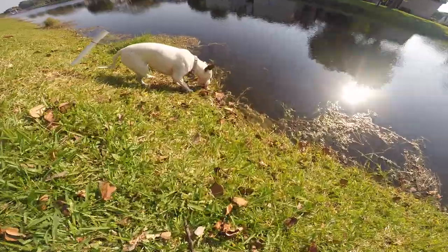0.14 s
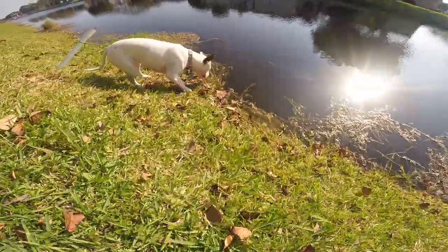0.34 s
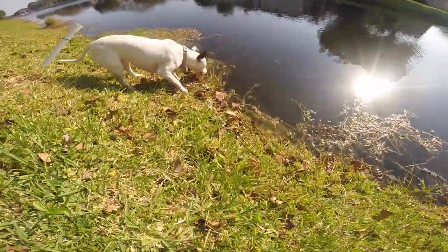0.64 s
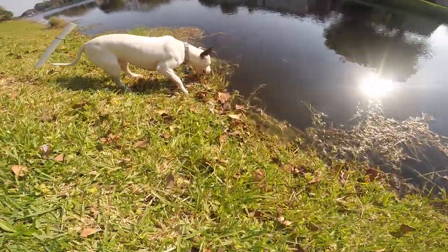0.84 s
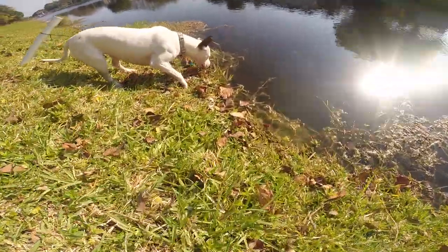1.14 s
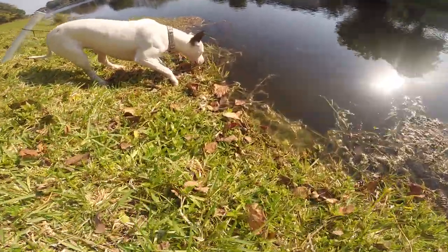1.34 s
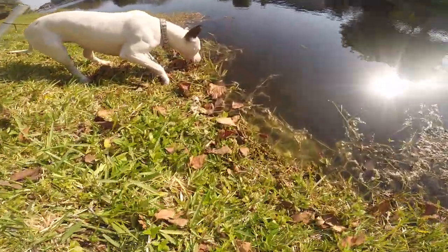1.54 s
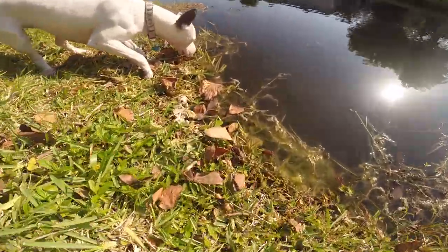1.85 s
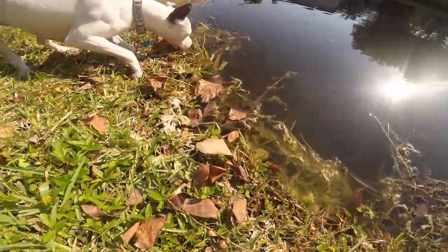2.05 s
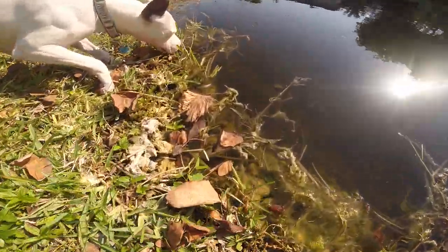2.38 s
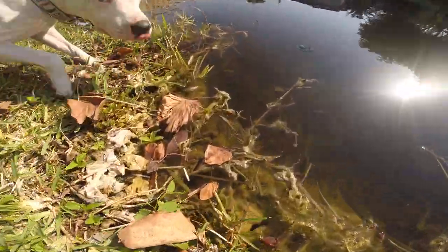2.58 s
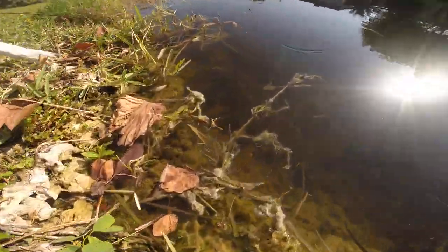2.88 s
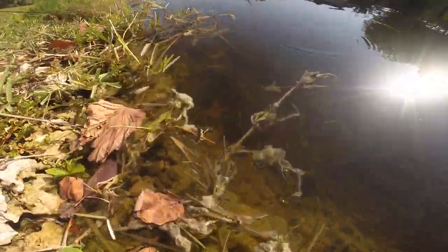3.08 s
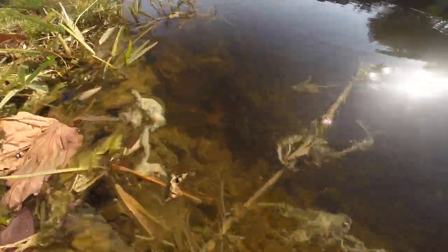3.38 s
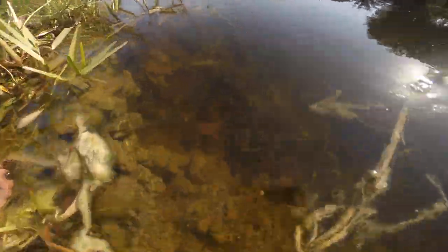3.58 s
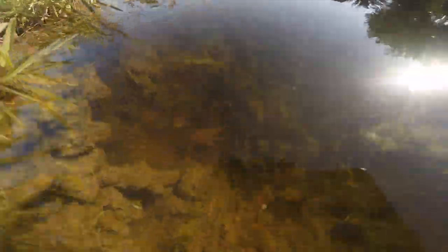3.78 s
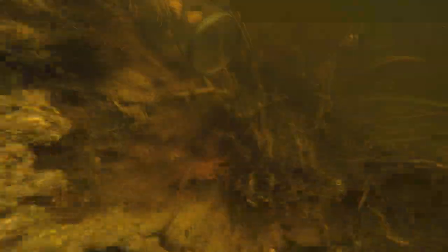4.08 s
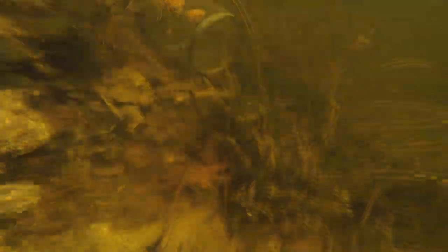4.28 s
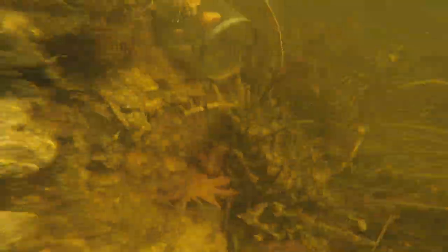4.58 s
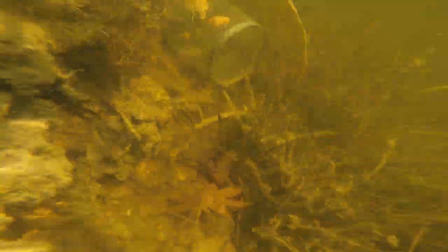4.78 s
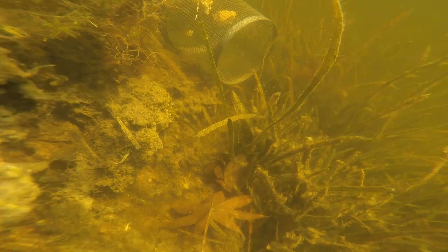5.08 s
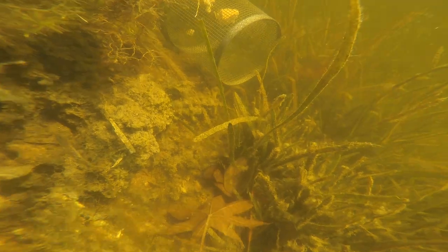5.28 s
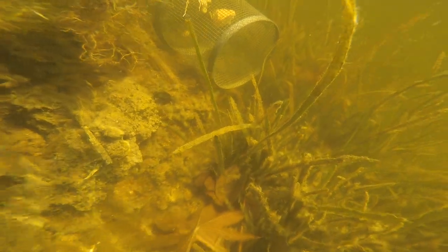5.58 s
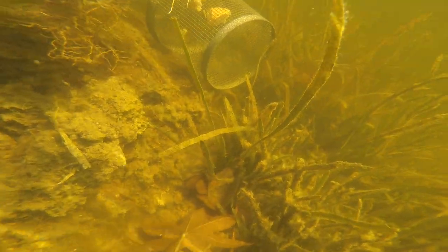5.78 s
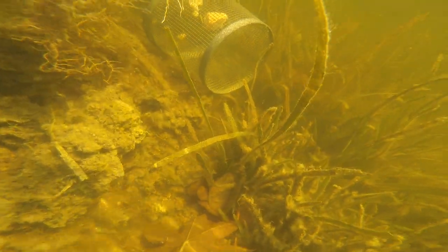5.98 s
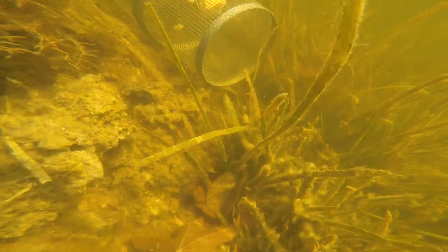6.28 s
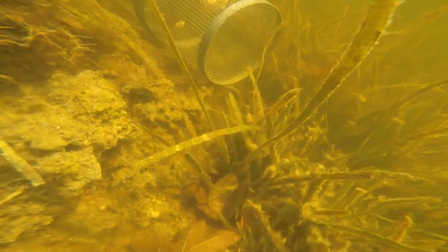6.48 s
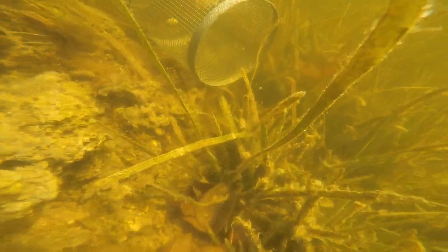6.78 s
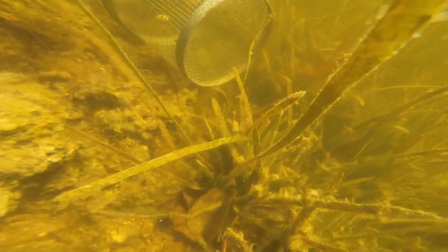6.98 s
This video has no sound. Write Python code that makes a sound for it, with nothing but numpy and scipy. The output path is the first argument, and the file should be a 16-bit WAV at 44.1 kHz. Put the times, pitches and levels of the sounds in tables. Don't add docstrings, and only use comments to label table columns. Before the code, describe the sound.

Close, muffled handling noise, the microphone shut in a waterproof case. Plastic taps and deep, springy booms come in irregular groups, with barely audible grass rustle. Delicate metal tags jingle faintly nearby, then a hard click and splash mark the dip under water. Bubbles blip and gulp, the tone grows duller, and a burst of heavy knocks and rubbing fades to low rumble and faint hiss.

```python
import sys
import numpy as np
from scipy import signal
from scipy.fft import rfft, irfft
from scipy.io import wavfile
from scipy.ndimage import uniform_filter1d

SR = 44100
rng = np.random.default_rng(int(sys.argv[2]) if len(sys.argv) > 2 else 0)


def to_wav(s):
    ch = np.atleast_2d(s).T
    pcm = np.round(np.clip(ch, -1, 1) * 32767)
    wavfile.write(sys.argv[1], SR, pcm.astype(np.int16))


def invert_db(level):
    return 10 ** (np.asarray(level, dtype=float) / 20)


N = 314874
DIVE_S = 4.3
PING_WIDTH, SNAP_WIDTH = 0.09, 0.8

# t/s, shell crack level/dB, thud level/dB, upper bending tone against lower/dB
BLOWS = [(-0.022, -80, -25, -10), (0.022, -66, -39, 9), (0.0986, -64, -15, 5), (0.1324, -58, -22.5, 6),
         (0.329, -45, -34.5, 13), (0.359, -27.5, -24.5, 8.5), (0.396, -36.5, -25.5, 10.5),
         (0.850, -40, -27, 1), (0.862, -29, -49, -9), (0.884, -24.5, -29.5, 4), (0.903, -24.5, -25.5, -8),
         (0.945, -62, -37, 21), (1.022, -42, -36, 4), (1.055, -63, -39.5, 7), (1.166, -50, -31.5, 10),
         (1.225, -29.5, -35.5, 19), (1.416, -28, -19, -0.5), (1.881, -73, -37.5, 3.5),
         (2.7, -58, -29.5, -4), (2.742, -38, -26, 13.5), (2.8975, -29, -16, 0), (2.931, -58, -34.5, 23),
         (2.951, -48, -29, 14), (3.0555, -49, -12, 6), (3.476, -28.5, -14.5, 5.5)]
# t/s, crack level/dB, thud level/dB, upper against lower/dB
WET_BLOWS = [(4.0648, -19, -41, 1), (4.604, -32, -27.5, -0.5), (5.0, -60, -40, 0), (5.249, -61, -40.5, 1),
             (5.662, -42, -32, 9), (5.681, -43.5, -24, 4), (5.726, -44, -24, 2), (5.7539, -43, -23, 9.5),
             (5.775, -43, -21, 8), (5.809, -72, -15.5, -1), (5.988, -24.5, -17, 3), (6.03, -51, -17, 2),
             (6.039, -31, -31, 1), (6.048, -22, -17, -2.5), (6.0815, -15.5, -14, 5.5),
             (6.131, -26.5, -45, -2), (6.176, -37, -32, 3), (6.36, -48, -30, -5), (6.513, -55, -27.5, -7),
             (6.628, -69, -33.5, 3), (6.904, -56, -46, 3)]


def evened(x):
    return x / np.sqrt(np.mean(x ** 2) + 1e-20)


def add(mix, s, sound):
    at = round(s * SR)
    heard = sound[max(-at, 0):]
    part = mix[max(at, 0):][:len(heard)]
    part += heard[:len(part)]


def resonate(x, hz, width):
    r = np.exp(-np.pi * width / SR)
    return (1 - r) * signal.lfilter([1, 0, -1], [1, -2 * r * np.cos(2 * np.pi * hz / SR), r * r], x)


def twice(x, hz, width):
    return resonate(resonate(x, hz, width), hz, 0.5 * width)


def burst(db, hz, t60, width, leak=0.04):
    t = np.arange(2500) / SR
    spray = rng.standard_normal(len(t)) * invert_db(-60 * t / t60)
    spray[0] += 8.0
    spray = twice(spray, hz, width) + leak * uniform_filter1d(spray, size=7)
    return invert_db(db) * spray / abs(spray).max()


def soft_start(t, rise):
    return np.sin(np.pi / 2 * np.minimum(t / rise, 1)) ** 2


def ring(modes, pitch, t):
    return sum(weight * invert_db(-60 * t / t60) * np.sin(2 * np.pi * hz * pitch * t) for hz, weight, t60 in modes)


def pole():
    # f/Hz, signed weight, t60/s
    bends = [(65.08, 1, 0.41), (89.3, -1.67, 0.2)]
    # f/Hz, signed weight, t60/s
    stiff_bends = [(150.5, -1.45, 0.092), (234.7, 0.56, 0.094), (429.5, -0.47, 0.028)]
    # t/s, level/dB, pitch ratio
    knocks = [(0.104, -36, 1), (0.125, -36, 1), (2.951, -36, 1), (3.0545, -29, 1.05), (3.068, -33, 1.1),
              (3.482, -33, 1), (4.2, -43, 1), (5.748, -29, .9), (5.773, -27, .9), (5.795, -31, .9)]
    # t/s, level/dB
    grip = [(0.0, -23.5), (0.12, -38), (1.11, -44), (1.95, -47.5), (2.66, -47.5), (2.95, -33.5),
            (3.22, -51.5), (3.52, -49), (3.66, -49), (4.26, -48.5), (4.62, -48.5), (4.74, -57.5),
            (4.9, -46.5), (5.68, -47), (5.83, -35), (6.5, -35.5), (6.78, -37.5), (7.14, -36)]
    wet_pitch, wet_upper = 0.885, 0.965
    rise_s, slowest_s = 0.0038, 0.015
    out, t = np.zeros(N), np.arange(SR // 2) / SR

    for s, crack_db, db, upper_db in BLOWS + WET_BLOWS:
        wet = s > DIVE_S
        pitch = wet_pitch if wet else 1
        low = ring(bends[:1], pitch, t)
        high = ring(bends[1:], pitch * (wet_upper if wet else 1), t)
        hard_db = min(1 + 0.69 * (crack_db - db), 7.5)
        body = invert_db(-upper_db / 2) * low + invert_db(upper_db / 2) * high
        body = body + invert_db(hard_db) * ring(stiff_bends, 0.955, t)
        rise = np.clip(rise_s * invert_db(0.32 * (db - crack_db - 15)), rise_s, slowest_s)
        add(out, s + 0.004, invert_db(db - 2.0) * body * soft_start(t, rise))
    for s, db, pitch in knocks:
        add(out, s, invert_db(db) * ring(stiff_bends, pitch, t) * soft_start(t, rise_s))

    now = np.arange(N) / SR
    shake = rng.standard_normal(N)
    in_air = sum(resonate(resonate(shake, hz, 4.9), hz, 32.0) for hz, _, _ in bends)
    in_water = sum(resonate(resonate(shake, hz * wet_pitch, 2.7), hz, 42) for hz, _, _ in bends)
    dipped = np.clip((now - DIVE_S) / 0.05, 0, 1)
    hum = np.sqrt(dipped) * evened(in_water) + np.sqrt(1 - dipped) * evened(in_air)
    hum = hum + invert_db(-41.5) * evened(resonate(resonate(shake, 150, 150), 130, 360))

    sway = evened(resonate(resonate(rng.standard_normal(N), 18.6, 24), 20.7, 27))
    tremor = invert_db(np.interp(now, *np.transpose(grip)))
    thrown = uniform_filter1d(abs(out), round(0.039 * SR))
    return out + tremor * hum + (invert_db(-4) * tremor + invert_db(-18) * thrown) * sway


def shell(drive):
    # f/Hz, width/Hz, level/dB
    air_modes = [(437, 45, 13), (664, 51, 12.5), (1150, 190, 4.5), (1560, 144, 8.5), (1790, 125, 10),
                 (2090, 330, 7), (2730, 250, 7.5), (2970, 136, 6), (3530, 91, 4), (4700, 145, 1),
                 (5650, 890, -9.5)]
    # f/Hz, width/Hz, level/dB
    water_modes = [(438, 90, 3), (630, 60, 7), (920, 50, 8.5), (1170, 56, 2.5), (1280, 44, 6.5),
                   (1530, 320, -1.5), (2320, 200, -5), (2730, 140, -9.5), (3480, 400, -18),
                   (4666, 120, -13), (5800, 170, -22)]
    wet = np.arange(N) / SR > DIVE_S
    out = np.zeros(N)
    for part, modes in ((drive * ~wet, air_modes), (drive * wet, water_modes)):
        gain = np.sqrt(sum(invert_db(2 * db) * w for _, w, db in modes) * np.pi / SR)
        for k, (hz, w, db) in enumerate(modes):
            out += (-1) ** k * invert_db(db) * resonate(part, hz, w) / gain
    return signal.sosfilt(signal.butter(3, 6500, fs=SR, output="sos"), out)


def contact():
    # start t/s, length/s, level/dB
    rubs = [(0.024, 0.025, -59), (0.09, 0.073, -41), (0.178, 0.035, -72), (0.314, 0.012, -49),
            (0.29, 0.025, -60), (0.366, 0.015, -47.5), (0.393, 0.099, -50.5), (0.86, 0.11, -59),
            (0.907, 0.14, -63.5), (1.024, 0.014, -56), (1.226, 0.044, -54), (1.433, 0.054, -57),
            (2.84, 0.026, -56), (4.037, 0.026, -49), (4.076, 0.023, -50.5), (5.656, 0.04, -64),
            (5.732, 0.021, -60), (6.02, 0.13, -47.5), (6.134, 0.11, -46.5), (6.085, 0.04, -46),
            (6.22, 0.045, -58), (6.54, 0.06, -61), (3.06, 0.04, -60), (5.77, 0.08, -60),
            (6.366, 0.119, -57.5), (6.457, 0.17, -57), (6.615, 0.13, -66), (6.758, 0.36, -64)]
    loudness, strikes, t = np.zeros(N), np.zeros(N), np.arange(1500) / SR
    for s, crack_db, _, _ in BLOWS + WET_BLOWS:
        add(loudness, s, invert_db(crack_db - 7.5 - 60 * t / 0.03))
        add(strikes, s, invert_db(crack_db + 12) * signal.windows.hann(7) / 3)
    grain = invert_db(2.8 * evened(uniform_filter1d(rng.standard_normal(N), 45)))
    for s, length, db in rubs:
        stroke = signal.windows.tukey(round(length * SR), 0.3)
        add(loudness, s, invert_db(db) * stroke * grain[round(s * SR):][:len(stroke)])
    return shell(loudness * rng.standard_normal(N) + strikes)


def tags():
    # t/s, peak level/dB, click level/dB, t60/s, f/Hz
    clinks = [(2.6518, -42.5, -54, 0.033, 9900), (2.6968, -37.5, -45, 0.028, 10300),
              (2.706, -36, -56, 0.023, 9900), (2.822, -51.5, -52, 0.05, 10100),
              (2.975, -56, -64, 0.03, 10000), (2.995, -55, -62, 0.03, 9700), (3.021, -54, -62, 0.03, 10600),
              (3.036, -55, -64, 0.03, 9800), (3.046, -55, -62, 0.03, 10000), (3.066, -52, -60, 0.03, 10300),
              (3.14, -61, -64, 0.06, 10100), (2.855, -58, -58, 0.03, 10300), (3.057, -48, -63, 0.027, 9530),
              (3.1038, -49, -54, 0.048, 10700), (3.1134, -56.5, -56, 0.06, 9800),
              (3.1727, -52.5, -69, 0.046, 10000), (3.273, -46, -49, 0.04, 10100),
              (3.3002, -45, -49.5, 0.12, 9970), (3.311, -45, -53, 0.1, 10000),
              (3.3354, -38, -52, 0.032, 10000), (3.4511, -49, -55, 0.048, 10140),
              (3.788, -57, -62, 0.063, 10200), (3.872, -56, -61, 0.051, 10000),
              (3.9, -55, -68, 0.092, 10100), (3.93, -70, -63, 0.06, 10300)]
    # pitch ratio, level/dB
    disc_tones = [(0.993, 4), (0.94, -12), (0.58, -28), (0.31, -23)]
    # t/s, peak level/dB, f/Hz, t60/s
    pings = [(2.697, -39.5, 8900, 0.044), (2.940, -52, 4450, 0.038), (3.060, -49, 10600, .03)]
    out, t = np.zeros(N), np.arange(6000) / SR
    for s, db, click_db, t60, hz in clinks:
        tone = invert_db(click_db - 14 + 3.0) * np.sin(2 * np.pi * 13900 * t)
        for ratio, tone_db in disc_tones:
            luck = rng.standard_normal()
            tone += invert_db(db - 5.5 + tone_db + 3.9 * luck) * np.sin(2 * np.pi * hz * ratio * t + luck)
        slow = uniform_filter1d(uniform_filter1d(rng.standard_normal(len(t)), 90), 90)
        rattle = invert_db(3.0 * evened(slow))
        click = twice(rng.standard_normal(len(t)) * invert_db(click_db - 60 * t / 0.03), 4200, 8000)
        add(out, s, invert_db(-60 * t / t60) * tone * rattle * np.minimum(t / 0.0009, 1) + 2.06 * click)
    for s, db, hz, t60 in pings:
        add(out, s, burst(db, hz, t60, PING_WIDTH * hz))
    return out


def splashes():
    # t/s, peak level/dB, centre f/Hz, t60/s
    ticks = [(3.556, -50, 12200, 0.0087), (4.021, -36, 5540, 0.012), (4.0653, -20, 5600, 0.004),
             (4.0668, -20, 3200, 0.014), (4.0655, -20, 2700, 0.005), (4.248, -26, 7000, 0.0036),
             (4.846, -24.5, 11700, 0.0021), (4.900, -47, 13200, 0.0049), (4.937, -35.5, 5460, 0.01),
             (5.016, -29.5, 5360, 0.007), (6.134, -41, 7300, 0.0081)]
    # t/s, peak level/dB, centre f/Hz, t60/s
    slaps = [(0.0, -44, 1500, 0.006), (4.893, -35, 2200, 0.014), (4.985, -32, 2300, 0.014),
             (4.846, -43, 1200, 0.012), (0.752, -43, 5800, 0.01), (0.992, -48, 2600, 0.01),
             (4.681, -35, 1540, 0.012), (4.173, -45, 2700, 0.025), (4.073, -22, 2940, 0.0063),
             (4.247, -25, 2400, 0.021), (4.317, -32, 1600, 0.025), (4.675, -39, 3500, 0.009),
             (4.680, -35.5, 5360, 0.0087), (4.842, -42, 2860, 0.018), (4.846, -30.5, 4870, 0.0041),
             (4.908, -47, 7000, .006), (4.985, -39, 3970, 0.0066), (4.999, -42, 4430, 0.0072),
             (4.999, -38, 2600, 0.012), (5.016, -42, 2000, 0.01), (5.078, -40, 2600, 0.01),
             (1.456, -48, 2300, 0.015), (6.123, -46, 2970, 0.012)]
    out = np.zeros(N)
    for rows, share in ((ticks, 0.4), (slaps, 0.95)):
        for s, db, hz, t60 in rows:
            add(out, s, burst(db, hz, t60, share * hz))
    return out


def bubbles():
    # t/s, peak level/dB, f/Hz, t60/s, mean glide over the first 27 ms/(octaves a second)
    clear_bubbles = [(4.163, -30, 1634, 0.024, -6), (4.1687, -23, 1550, 0.013, -4),
                     (4.170, -26, 1760, 0.018, 0), (4.172, -31.5, 658, .045, -1),
                     (4.174, -37, 2750, 0.015, 1), (4.250, -45.5, 657, 0.072, 2),
                     (4.251, -36.5, 1820, 0.03, 4), (4.985, -25, 1200, 0.03, 0),
                     (5.065, -21.5, 1100, 0.034, 2), (5.176, -21.5, 1260, 0.028, -2),
                     (5.956, -45.5, 1100, 0.025, 5), (5.990, -45, 1170, 0.05, -2),
                     (6.136, -18, 1030, 0.027, -6), (6.166, -38.5, 2230, 0.025, 8),
                     (6.545, -44, 925, 0.12, 0), (6.59, -43, 925, 0.05, 0), (5.771, -30, 640, 0.045, -4)]
    # t/s, peak level/dB, f/Hz,
    # t60/s
    gulps = [(4.02, -37, 1760, 0.048), (4.211, -37, 1660, 0.02), (4.317, -33, 500, 0.025),
             (4.605, -44, 1500, 0.036), (4.808, -44.5, 467, 0.052), (4.893, -30, 1250, 0.025),
             (5.74, -44, 500, 0.04), (5.006, -24, 600, 0.014), (5.009, -36, 1000, 0.06),
             (1.416, -35, 1100, 0.025), (2.897, -36, 1150, 0.025), (2.742, -40, 620, 0.04),
             (2.951, -43, 560, 0.04), (3.054, -44, 480, 0.03), (0.318, -42, 1550, 0.03),
             (5.177, -28, 754, 0.023), (5.758, -38, 1280, 0.037), (6.25, -43.5, 920, 0.13),
             (6.62, -47, 930, 0.05), (6.49, -46, 930, 0.099), (6.585, -45.5, 935, 0.11),
             (6.679, -43, 1340, 0.042), (6.61, -45, 1510, 0.035), (6.651, -49, 1480, 0.035),
             (6.712, -50, 1520, 0.03), (4.8925, -33, 600, 0.02), (4.985, -31, 680, 0.018),
             (4.067, -31, 1700, 0.016), (4.163, -32, 1600, 0.03), (3.476, -35, 1050, 0.025),
             (1.226, -42, 700, 0.03), (0.862, -40, 330, 0.05)]
    out, t = np.zeros(N), np.arange(2500) / SR
    events = [(*row, 0.11) for row in clear_bubbles] + [(*row, 0, 0.6) for row in gulps]
    push = -np.sin(2 * np.pi * 300 * t) * invert_db(-60 * t / 0.024) * np.minimum(t / 0.0037, 1)
    for s, db, hz, t60, glide, rough in events:
        turns = np.cumsum(hz * 2 ** np.clip(glide * t * t / 0.027, -1, 2)) / SR
        clean = -np.sin(2 * np.pi * turns) * np.clip((48 - turns) / 5, 0, 1)
        torn = evened(twice(rng.standard_normal(len(t)), hz, 0.8 * hz))
        fade = invert_db(-60 * (t / t60) ** 1.1) * np.minimum(t / 0.001, 1)
        pop = ((1 - rough) * clean + rough * torn) * fade
        cycle = np.minimum(1.003 * hz * t, 1)
        pinch = -np.sin(2 * np.pi * cycle) * np.sin(np.pi * cycle)
        add(out, s, invert_db(db) * (pop + 1.2 * pinch + 0.5 * push))
    return out


def held_bubbles():
    # t/s, level/dB, f/Hz, life/s, glide over the life/octaves
    ringing_on = [(4.895, -41, 1270, 0.029, 1.35), (4.992, -37, 1150, 0.014, 0.15),
                  (4.175, -46, 2750, 0.008, 0.05), (5.18, -46, 1200, 0.022, -0.05),
                  (5.762, -25, 520, 0.012, 0.35), (4.0654, -6.5, 3950, 0.0014, -0.2)]
    out = np.zeros(N)
    for s, db, hz, life, octaves in ringing_on:
        age = np.arange(round(life * SR)) / (life * SR)
        turns = np.cumsum(hz * 2 ** (octaves * age ** 2)) / SR
        add(out, s, invert_db(db) * signal.windows.tukey(len(age), 0.4) * np.sin(2 * np.pi * turns))
    return out


def specks():
    # t/s, peak level/dB, centre f/Hz, t60/s
    snaps = [(3.274, -41, 4800, 0.012), (3.299, -52, 2700, 0.012), (3.331, -50, 6200, 0.007),
             (3.337, -48, 6200, 0.008), (4.0205, -44, 11500, 0.005), (4.0655, -23, 13000, 0.004),
             (4.0655, -22, 9500, 0.004), (4.073, -34, 12500, 0.004), (4.073, -30, 8500, 0.004),
             (4.173, -38, 2500, 0.02), (4.6805, -40, 7000, 0.006), (4.846, -36, 5900, 0.006),
             (5.016, -36, 4500, 0.008), (5.016, -41, 6800, 0.005), (4.999, -42, 6500, 0.005),
             (5.022, -42, 900, 0.03), (6.04, -38, 1600, 0.015), (6.124, -40, 2500, 0.012),
             (6.134, -33, 2300, 0.014), (0.041, -48, 1800, 0.012), (0.195, -50, 2900, 0.012),
             (4.074, -32, 5600, 0.012), (4.9, -47, 5000, 0.006), (4.82, -52, 3200, 0.01),
             (4.675, -42, 5800, 0.006), (6.124, -44, 3500, 0.008)]
    # t/s, peak level/dB, f/Hz, t60/s
    small_rings = [(3.275, -55, 7600, 0.08), (3.294, -52, 10000, 0.03), (3.312, -52, 7000, 0.04),
                   (3.315, -50, 13900, 0.05), (3.331, -43, 10000, 0.025), (3.3365, -39, 10100, 0.03),
                   (5.988, -47, 4670, 0.015), (5.988, -50, 5800, 0.02), (6.026, -40, 1430, 0.04),
                   (6.11, -54, 4670, 0.03), (6.252, -46, 920, 0.08), (0.885, -34, 1540, 0.025),
                   (0.863, -38, 1540, 0.025), (0.904, -36, 2900, 0.02), (0.362, -38, 2030, 0.04),
                   (4.607, -44, 1500, 0.015), (0.1, -48, 4700, 0.15), (0.125, -49, 4700, 0.1)]
    # t/s, peak level/dB, centre f/Hz, t60/s
    hollows = [(0.11, -44, 450, 0.12), (2.746, -43, 480, 0.06), (2.9, -40, 560, 0.06),
               (2.952, -48, 450, 0.06), (3.057, -38, 380, 0.07), (3.479, -44, 400, 0.07),
               (4.608, -37, 450, 0.06), (4.066, -30, 750, 0.02), (5.664, -42, 600, 0.04),
               (6.15, -40, 750, 0.25), (4.172, -38, 1100, 0.03), (5.008, -35, 800, 0.05)]
    out = np.zeros(N)
    for rows, share, leak in ((snaps, SNAP_WIDTH, 0.02), (small_rings, PING_WIDTH, 0), (hollows, SNAP_WIDTH, 0)):
        for s, db, hz, t60 in rows:
            add(out, s, burst(db, hz, t60, share * hz, leak))
    return out


def rustle():
    # centre t/s, half length/s, level/dB, colour (0 dull to 2 bright)
    swishes = [(0.05, 0.03, -68, 0.55), (0.19, 0.05, -63, 0.37), (0.69, 0.17, -61.5, 0.62),
               (0.94, 0.15, -65, 1), (1.582, 0.25, -59, 0.1), (1.835, 0.26, -61, 0.54),
               (2.87, 0.46, -63, 0.16), (2.85, 0.042, -57, 1), (3.02, 0.13, -66.5, 2.0),
               (3.31, 0.068, -66, 1.6), (3.11, 0.03, -62, 2.2), (4.045, 0.05, -51, 0.51),
               (4.055, 0.065, -59.5, 2.6), (4.216, 0.28, -55.5, -0.38), (4.45, 0.75, -61, -0.56),
               (4.864, 0.36, -60, -0.46), (4.2, 0.2, -68, 2.2)]
    # f/Hz, width/Hz, level/dB
    dull_band = [(1640, 2660, 5.7), (2475, 840, 3.5)]
    middle_band = [(4600, 2500, -6.5), (5610, 1800, 1.5)]
    bright_band = [(8160, 2500, 0), (10300, 1800, 3), (13300, 2500, -3)]
    steady_db = (-71, -76.5, -89)
    t, out = np.arange(N) / SR, np.zeros(N)
    flicker = invert_db(2.2 * evened(uniform_filter1d(rng.standard_normal(N), 400)))
    for k, band in enumerate((dull_band, middle_band, bright_band)):
        strength = invert_db(2 * steady_db[k]) * np.ones(N)
        for s, half, db, colour in swishes:
            band_db = db - 6 * (k - colour) ** 2
            strength += invert_db(2 * band_db) * np.maximum(1 - abs(t - s) / half, 0) ** 2
        noise = rng.standard_normal(N)
        out += np.sqrt(strength) * flicker * evened(sum(invert_db(db) * twice(noise, hz, w) for hz, w, db in band))
    return out


def electronics():
    # f/Hz, level/(dB per Hz)
    hiss_colour = [(59, -17.5), (100, -5.5), (313, -16.5), (5070, -34), (5760, -36.5), (8240, -39),
                   (8780, -42.5), (12100, -42), (13400, -56), (14600, -46), (14950, -52), (15050, -74)]
    # f/Hz, peak level/dB
    whines = [(2930, -82), (5860, -81), (8781, -77), (11718, -80), (14625, -84.5)]
    t = np.arange(N) / SR
    f, db = np.transpose(hiss_colour)
    bins = np.fft.rfftfreq(N, 1 / SR)
    colour = invert_db(np.interp(np.log(bins + 1), np.log(f), db))
    out = invert_db(-56.5) * evened(irfft(rfft(rng.standard_normal(N)) * colour, N))
    drift = 0.51 * np.cumsum(rng.standard_normal(N)) / np.sqrt(SR)
    for hz, whine_db in whines:
        out += invert_db(whine_db + 0.1) * np.sin(2 * np.pi * hz * t + hz / 2930 * drift)
    return out


def scene():
    knocked = pole() + contact() + tags()
    wet = splashes() + bubbles() + held_bubbles()
    return (knocked + wet + specks() + rustle() + electronics())[None]


def roll_off(x):
    return signal.sosfilt(signal.butter(12, 15700, fs=SR, output="sos"), x)


def record(dry):
    # start t/s, length/s
    thin_moments = [(0.09, .012), (0.308, .058), (0.543, .038), (0.845, .05), (1.226, .018), (1.397, .02),
                    (2.664, .029), (2.718, .061), (2.89, .035), (3.465, .03), (3.566, .017), (4.147, .02),
                    (4.232, .012), (4.296, .045), (4.854, .03), (4.91, .02), (4.949, .03), (5.175, .014),
                    (5.696, .014), (5.864, .047), (5.93, .03), (5.97, .025), (6.347, .05), (6.65, .03),
                    (6.74, .025), (6.858, .14), (7.099, .028)]
    gap = np.zeros(N)
    for s, length in thin_moments:
        add(gap, s, np.ones(round(length * SR)))
    top_filter = signal.firwin(401, 12900, fs=SR, pass_zero=False)
    top = signal.oaconvolve(dry, top_filter[None], "same")
    kept = dry - 0.8 * uniform_filter1d(gap, size=200) * top
    edge = signal.firwin(301, 15700, fs=SR)
    mix = signal.oaconvolve(kept, edge[None], "same")
    return roll_off(mix)


dry = scene()
out = record(dry)
to_wav(out)
```